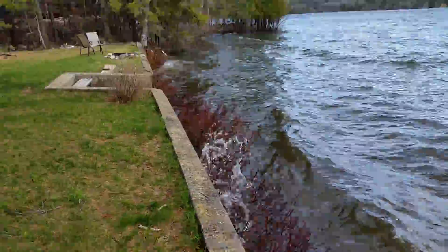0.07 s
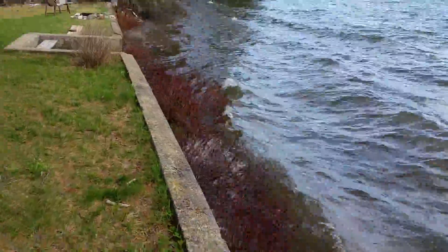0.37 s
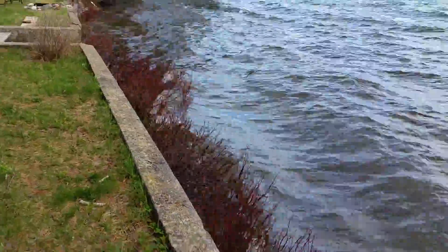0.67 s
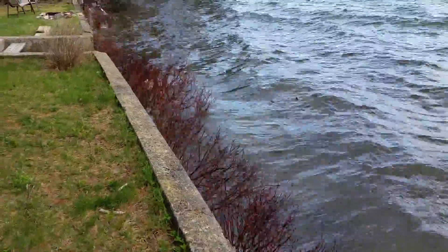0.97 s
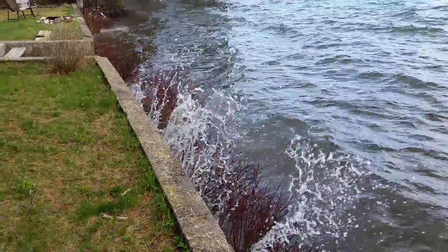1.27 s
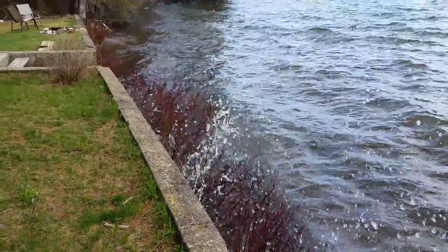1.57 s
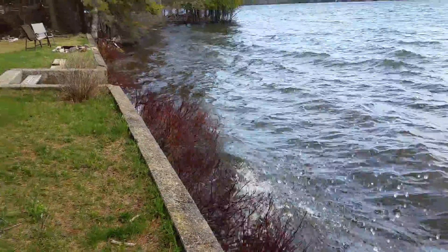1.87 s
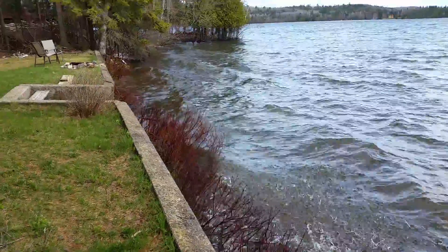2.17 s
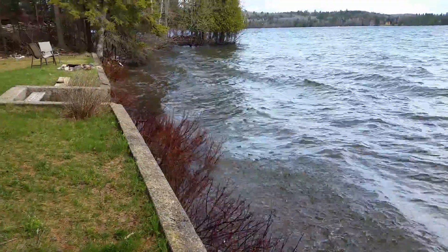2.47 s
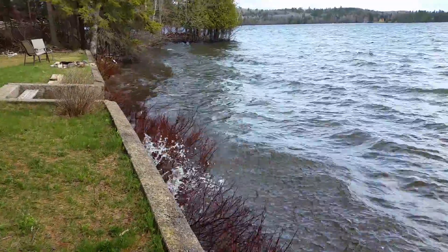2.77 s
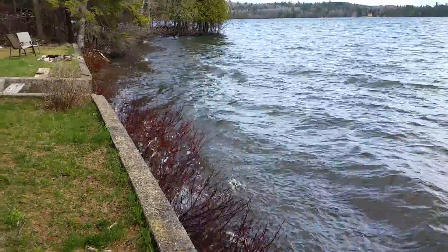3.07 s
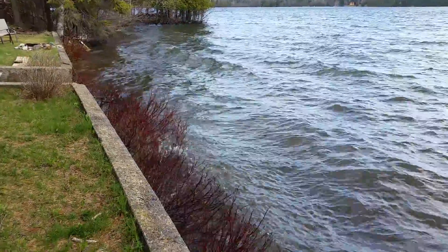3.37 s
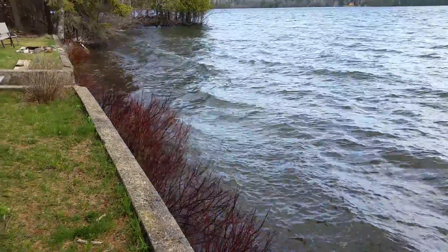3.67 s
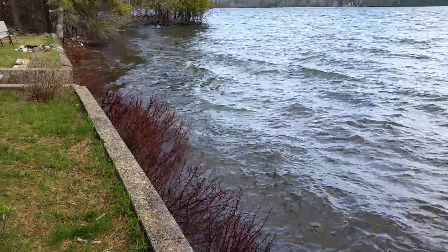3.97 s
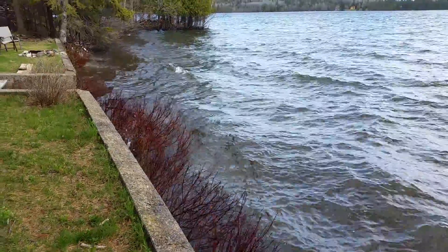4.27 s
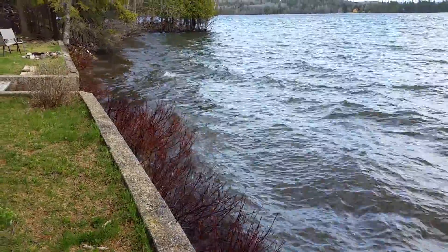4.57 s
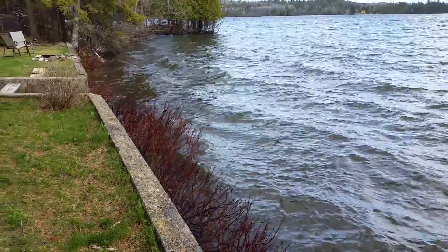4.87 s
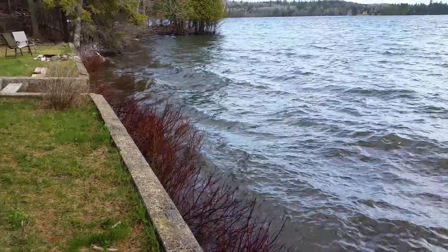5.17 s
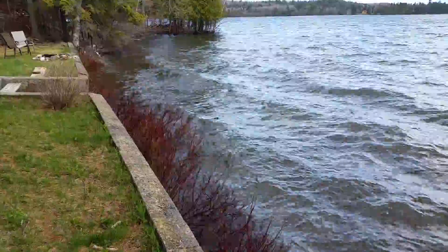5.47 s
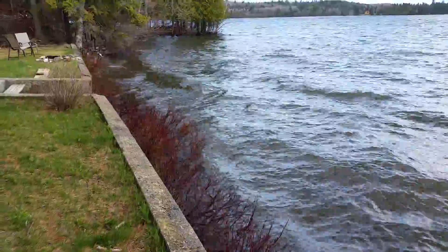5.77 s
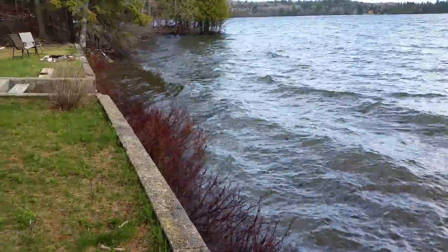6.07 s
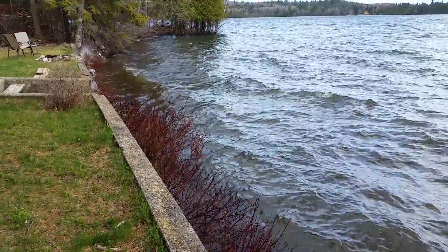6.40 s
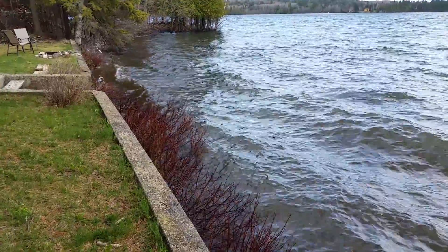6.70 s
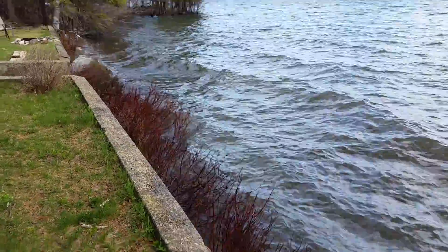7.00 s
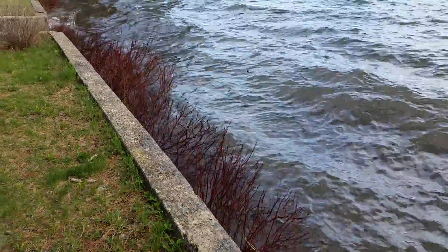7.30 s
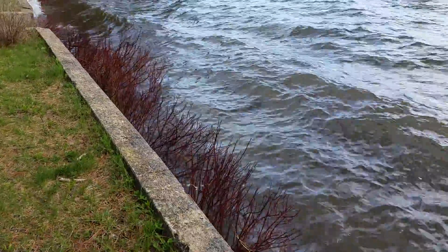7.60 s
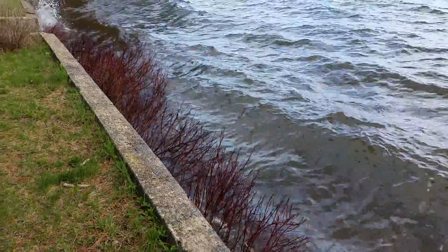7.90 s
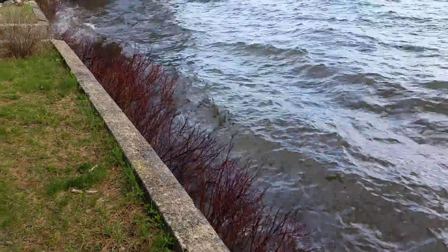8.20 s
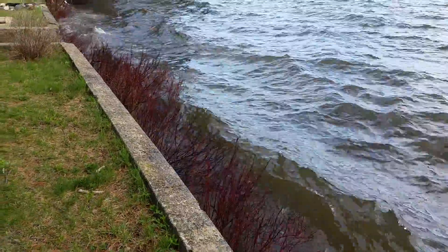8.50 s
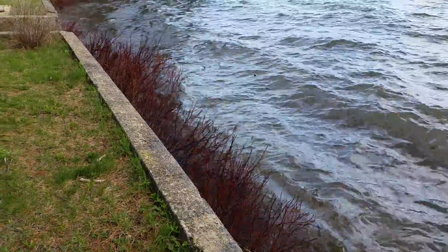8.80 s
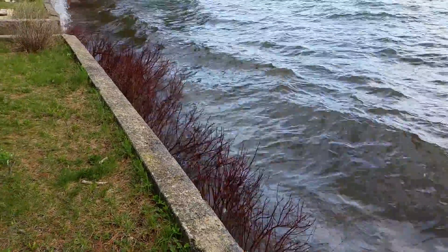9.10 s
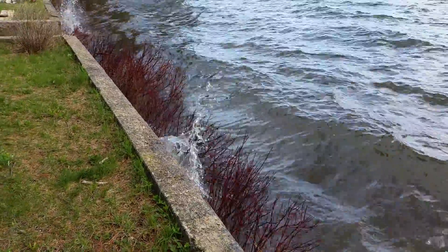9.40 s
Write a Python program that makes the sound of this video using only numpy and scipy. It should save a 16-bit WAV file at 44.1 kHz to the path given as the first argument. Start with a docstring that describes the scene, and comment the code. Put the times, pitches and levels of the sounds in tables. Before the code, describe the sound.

Lake waves slap and splash against a low wall while gusts of wind rumble and buffet the microphone.

```python
"""On a lawn above a lake, on a windy day, waves are heard running against a low shore wall.
Near waves slap the wall and their spray patters back; later ones wash along the shore farther off.
The water sounds by bubble resonance: trapped air rings, and the smaller the pocket, the higher its pitch.
Turbulent pressure rumbles and buffets at each of two microphone ports;
the hardest gusts drive a limiter that ducks the water."""
import sys
import numpy as np
from scipy import signal
from scipy.fft import rfft, irfft, next_fast_len
from scipy.io import wavfile
from scipy.ndimage import uniform_filter1d, minimum_filter1d, map_coordinates

SR = 44100
rng = np.random.default_rng(int(sys.argv[2]) if len(sys.argv) > 2 else 0)


def transcribe(signal):
    """Save signal, clipped to [-1, 1], as a 16-bit WAV file at the path in sys.argv[1]."""
    frames = np.atleast_2d(signal).T
    limited = np.clip(frames, -1, 1)
    pcm = np.round(limited * 32767).astype(np.int16)
    wavfile.write(sys.argv[1], SR, pcm)


N = 416744
TIME = np.arange(N) / SR


def waves():
    """Superposition of bubbles: near waves patter in coarse drops, far ones blur into a wash."""
    # spectra of near and far water: (frequency [Hz], left density [dB], right density [dB])
    near_spectrum = [(150, -49, -21), (505, -5, -7.5), (1030, -2, -8), (1940, 2, -10), (2530, -2.5, -16),
                     (3500, -5, -16), (4300, -12.5, -21.5), (5760, -8.5, -22), (7080, -2.5, -31),
                     (8400, -9, -32), (10400, -11.5, -31), (12300, -4.5, -19), (13900, -10.5, -14),
                     (15400, -9.5, -12)]
    far_spectrum = [(150, 6.5, 6.5), (597, 1.5, -2.5), (1010, 0, -6.5), (1820, -0.5, -8.5), (2460, -6, -20),
                    (3340, -8.5, -23.5), (4560, -19, -30.5), (5540, -27, -31), (6430, -16.5, -33),
                    (7250, -10, -34), (9000, -15, -40), (12500, -18.5, -29.5), (15900, -26.5, -22)]
    coarse = bubbles(per_s=7500, size_db=4.0, cycles=16.6, clump_db=4.0)
    slosh, fizz = water(near_spectrum, coarse, foam_db=1.0, lag_s=.0001, coherence=0.96,
                        churn_db=1.22, fizz_from_hz=3800)
    fizz = wander(fizz, octaves=.05, rate_hz=4)
    fine = bubbles(per_s=4000, size_db=3.0, cycles=17, clump_db=2.5)
    far = water(far_spectrum, fine, foam_db=4, lag_s=0.00024, coherence=0.57,
                churn_db=0.79, fizz_from_hz=3080)
    return sum(gain * part for gain, part in zip([*breaking(), *washing()], [slosh, fizz, *far]))


def bubbles(per_s, size_db, cycles, clump_db, clump_hz=12.7):
    """Damped resonance: random bubbles ring down 60 dB in `cycles` periods; most are small and high."""
    # large, low bubbles are much of a strength; only fine drops stand far out:
    # (pitch [Hz], greatest excess level [multiples of size_db])
    size_limit = [(2500, 2.3), (6000, 4.5)]
    out = np.zeros(N)
    pitches = np.geomspace(400, 15500, 26)
    for hz, share in zip(pitches, pitches / pitches.sum()):
        when, size, polarity = rng.random((6000, 3))[:int(per_s * share * N / SR)].T
        excess = np.minimum(-np.log(1 - size), np.interp(hz, *np.transpose(size_limit)))
        clicks = np.full(N, 1e-18)
        clicks[(when * N).astype(int)] = from_db(size_db * excess) * np.sign(polarity - .5)
        clicks *= from_db(clump_db * drift(clump_hz))   # like sizes come in clumps
        radius, angle = from_db(-60 * hz / (cycles * SR)), 2 * np.pi * hz / SR
        ringing = signal.lfilter([1, 0, -1], [1, -2 * radius * np.cos(angle), radius ** 2], clicks)
        out += np.sqrt(share) * rms_one(ringing)
    return rms_one(out)


def water(spectrum, grains, foam_db, lag_s, coherence, churn_db, fizz_from_hz):
    """Partial coherence of bubbles and foam: low slosh reaches the right port late; fizz is diffuse."""
    left = rms_one(grains + from_db(foam_db) * rng.standard_normal(N))
    diffuse = rng.standard_normal(N)
    right = coherence * np.interp(TIME - lag_s, TIME, left) + np.sqrt(1 - coherence ** 2) * diffuse
    churn = rms_one(from_db(churn_db * drift(19.0)))
    slosh = split(colour(churn * [left, right], spectrum, (1300, 3500)), fizz_from_hz)[0]
    fizz = split(colour(churn * [left, diffuse], spectrum, (6000, 15500)), fizz_from_hz)[1]
    return slosh, fizz


def breaking(attack_s=0.03, surge_db=2, surge_s=0.012, fizz_over_slosh_db=5):
    """Incoherent sources add in power: near slosh and fizz gains as waves burst and spray rains back."""
    # waves bursting on the wall: (time [s], level [dB], length [s])
    breakers = [(0, -31.5, 0.47), (1.075, -42.5, 0.57), (2.52, -41, 0.35), (9.24, -58, .2)]
    # sheets of falling spray: (middle time [s], spread [s], slosh level [dB], fizz level [dB])
    sheets = [(.56, 0.047, -33, -34), (.72, 0.053, -34, -29.5), (.88, 0.091, -38.5, -38),
              (1.135, 0.014, -28.5, -32.5), (1.32, 0.042, -41.5, -39.5), (1.68, 0.1, -35.5, -33.5),
              (1.87, 0.075, -35.5, -29.5), (1.98, 0.065, -35, -26.5), (2.12, 0.11, -36, -30),
              (2.275, 0.06, -36, -29.5), (2.42, 0.054, -37.5, -34), (2.71, 0.14, -38.5, -46),
              (2.83, 0.079, -36, -35.5), (3.16, 0.051, -35.5, -33.5), (3.32, 0.064, -36.5, -32.5),
              (3.462, 0.0094, -50, -39), (3.59, 0.049, -42.5, -43.5), (4.03, 0.21, -50, -47.5),
              (9.267, 0.011, -40, -42), (9.338, 0.013, -52, -46)]
    power = 0
    for s, db, length in breakers:
        age = np.maximum(TIME - s, 0)
        rise = np.minimum(age / attack_s, 1)
        burst = np.exp(-(age / length) ** 4)
        surge = from_db(surge_db) ** 2 * np.exp(-age / surge_s)
        power = power + from_db([[db], [db + fizz_over_slosh_db]]) ** 2 * rise * (burst + surge)
    for s, spread_s, slosh_db, fizz_db in sheets:
        power = power + from_db([[slosh_db], [fizz_db]]) ** 2 * bell(s, spread_s)
    return np.sqrt(power)


def washing(steady_slosh_db=-41, steady_fizz_db=-50):
    """Power summation: far slosh and fizz gains as each wave swells out of the shore's steady wash."""
    # far waves: (crest time [s], half length [s], slosh level [dB], fizz level [dB])
    washes = [(0.795, 0.091, -35.5, -42), (3.27, 0.17, -40, -41.5), (4.908, 0.45, -44.5, -52.5),
              (6.89, 0.1, -42.5, -45.5), (7.22, 0.14, -50, -46.5), (7.515, 0.17, -41.5, -47.5),
              (8.346, 0.13, -62, -43), (8.593, 0.051, -59, -49.5), (9.346, 0.041, -44, -69)]
    power = from_db([[steady_slosh_db], [steady_fizz_db]]) ** 2
    for s, spread_s, slosh_db, fizz_db in washes:
        power = power + from_db([[slosh_db], [fizz_db]]) ** 2 * bell(s, spread_s, order=4)
    return np.sqrt(power)


def slaps(attack_s=.003, spatter_db=3.0, spatter_hz=150):
    """Air entrainment: water hits the wall and traps pockets that ring in spurts around one pitch."""
    # slaps; the high ones are spray: (time [s], level [dB], pitch [Hz], spread [octaves], length [s])
    impacts = [(1.087, -20, 1050, 0.94, 0.0081), (1.098, -27, 1700, 0.54, .016),
               (1.103, -24.5, 720, 0.65, 0.047), (1.108, -18, 1490, .55, .012),
               (1.13, -27.5, 1700, 0.36, 0.016), (1.143, -25, 1250, 0.46, 0.016),
               (1.278, -37, 6200, .35, .05), (1.416, -26, 1000, 0.5, 0.014),
               (1.92, -30.5, 2170, 0.34, 0.28), (1.973, -27, 2190, 0.33, .035),
               (2.173, -31, 790, 0.19, 0.03), (2.249, -38.5, 4600, 0.3, 0.14),
               (2.538, -28, 1550, 0.5, 0.067), (2.565, -29, 900, 0.3, 0.037),
               (2.872, -33, 1220, 0.16, 0.026), (3.134, -31, 1700, .25, .025),
               (3.317, -31.5, 2100, 0.38, .05), (3.321, -38, 3670, .1, .06), (3.604, -39, 1700, .2, .01),
               (3.92, -37, 1000, 0.23, .025), (4.064, -33, 1550, .25, .02),
               (4.102, -36.5, 5500, 1.3, 0.043), (4.155, -35, 5000, 1.3, 0.027),
               (4.926, -40.5, 2500, 0.44, 0.087), (6.236, -30, 1660, 0.71, 0.026),
               (6.86, -30.5, 1680, 0.55, 0.011), (6.861, -31, 9500, .4, .007), (7.802, -38, 7500, .7, .011),
               (8.238, -43, 9000, 0.32, .03), (8.63, -37, 8500, 0.33, .012), (9.238, -47, 7500, .3, 0.026),
               (9.257, -32, 1960, 0.26, 0.027), (9.315, -32, 1550, 0.33, 0.018),
               (9.324, -47, 5500, 0.65, .03)]
    out, t = np.zeros((2, N)), TIME[:SR // 2]
    spatter = rms_one(from_db(spatter_db * drift(spatter_hz)))
    for s, db, hz, spread, length in impacts:
        shape = (1 - np.exp(-t / attack_s)) * np.exp(-(t / length) ** 2)
        add(out, s, from_db(db) * cloud(len(t), hz, spread) * shape, pan_db=25.0)
    return out * spatter


def plops(chirp_per_s=4):
    """Minnaert resonance: one air pocket rings briefly, rising in pitch as it nears the surface."""
    # large pockets trapped as water falls back: (time [s], level [dB], pitch [Hz], decay time [s])
    pockets = [(1.42, -18, 980, .003), (2.183, -21, 790, .005), (2.2185, -9.5, 1270, .002),
               (2.2205, -12.5, 2080, .0015), (2.222, -16, 2800, .002), (2.552, -20, 1080, .004),
               (2.876, -21.5, 1170, .006), (2.942, -24, 1720, .004), (3.28, -22, 920, .006),
               (4.613, -26, 1750, .004), (9.342, -13, 1400, .0016)]
    out, t = np.zeros((2, N)), TIME[:SR // 20]
    for s, db, hz, decay_s in pockets:
        ring = np.sin(2 * np.pi * hz * t * (1 + chirp_per_s * t))
        add(out, s, from_db(db) * ring * np.exp(-t / decay_s), pan_db=20)
    return out


def drops(attack_s=.00015, ping_gain=.5, chirp_per_s=2.7):
    """Impact and resonance: a drop ticks, and its tiny bubble rings upward in pitch."""
    # the loudest drops close by: (time [s], level [dB], pitch [Hz], decay time [s])
    near_drops = [(.444, -14, 11500, 0.0023), (.681, -23, 6460, .002), (1.357, -22, 6460, .002),
                  (1.451, -26, 8000, .0015), (1.585, -16, 13000, 0.0016), (1.654, -20, 8000, .0015),
                  (2.386, -18, 10500, .002), (2.68, -18, 13800, .0015), (2.8, -19.5, 7950, 0.0034),
                  (2.86, -22.5, 7000, .002), (3.014, -30, 5400, .002), (3.322, -17.5, 7200, 0.0019),
                  (3.728, -28, 7800, .002), (3.751, -29, 7240, .0015), (3.8411, -27, 7460, 0.00064),
                  (3.89, -33, 6910, .0007), (3.94, -32, 7290, .001), (3.988, -35, 9000, .001),
                  (4.09, -29, 7980, .0008), (4.121, -29, 11500, .001), (4.163, -32, 8120, .0008),
                  (4.224, -20.5, 7900, 0.00086), (4.2797, -25, 14500, .0015), (4.445, -30, 8060, 0.0011),
                  (4.4966, -28, 7670, .0005), (4.63, -29, 7900, 0.0009), (4.7, -36, 11000, .0008),
                  (5.3441, -37, 7600, .001), (5.544, -34, 7700, 0.00096), (5.942, -41, 8500, .002),
                  (6.56, -38, 7100, .002), (7.488, -32, 8500, .001), (7.733, -35, 9000, .001),
                  (8.18, -30, 8540, .001), (8.394, -27, 8500, .001), (8.563, -29, 8050, .0015),
                  (9.248, -33, 6740, 0.0036)]
    out, t = np.zeros((2, N)), TIME[:SR // 20]
    for s, db, hz, decay_s in near_drops + drips():
        tick = cloud(len(t), hz, octaves=.24)
        ping = np.sin(2 * np.pi * hz * t * (1 + chirp_per_s * t))
        shape = (1 - np.exp(-t / attack_s)) * np.exp(-t / decay_s)
        add(out, s, from_db(db) * (tick + ping_gain * ping) * shape, pan_db=26)
    return out


def drips(per_s=7, decay_s=.0007):
    """A Poisson process: faint drips fall from the shore bushes, as further rows for drops()."""
    times = np.cumsum(rng.exponential(1, 200)) / per_s
    levels_db = -44.5 + 5.5 * rng.standard_normal(200)
    pitches_hz = 8000 * 2 ** (0.26 * rng.standard_normal(200))
    return [(s, db, hz, decay_s) for s, db, hz in zip(times, levels_db, pitches_hz) if s < TIME[-1]]


def wind(flow_db, rumble_db, buffet_db, crackle_db, lump_db, burst_db, flutter_db):
    """Turbulence at one port: big eddies rumble in lumps, small ones flutter, hard gusts crackle."""
    # spectra of large, small and finest eddies: (frequency [Hz], density [dB])
    rumble_spectrum = [(12, -35), (25, -24.5), (45, -5), (90, -0.5), (140, -4), (200, -9.5), (280, -16.5),
                       (400, -31.5), (700, -66), (1500, -90)]
    buffet_spectrum = [(80, -51), (180, 4.5), (300, 1.5), (450, -6.5), (650, -15.5), (900, -25),
                       (1400, -33.5), (2500, -70), (6000, -98)]
    crackle_spectrum = [(300, -17), (800, 9), (1200, -4), (1800, -18), (2600, -14), (6000, -64)]
    low_db, high_db = flow_db
    swell = np.tanh(drift(32.3))   # the stream strikes the port and misses it in turns
    lumps = from_db(low_db) * rms_one(from_db(lump_db * swell))
    flutter = from_db(high_db) * rms_one(from_db(burst_db * swell + flutter_db * drift(136)))
    rumble = from_db(rumble_db) * colour(rng.standard_normal(N), rumble_spectrum, (30, 250))[0]
    buffet = from_db(buffet_db) * colour(rng.standard_normal(N), buffet_spectrum, (330, 800))[0]
    crackle = from_db(crackle_db) * colour(rng.standard_normal(N), crackle_spectrum, (800, 2500))[0]
    # the finest eddies grow faster than the gust itself
    return lumps * rumble + flutter * buffet + flutter ** 2 * crackle


def airflow(breeze_db, side, ordinary_db=-17.5, buffet_under_db=22.5, growth=1.84):
    """A power law: buffeting outgrows rumble in a gust. Both in dB at one port (side 1 left, -1 right)."""
    # gusts: (time [s], length [s], rumble level [dB], hardness [dB], left minus right [dB])
    gusts = [(0.612, 0.027, -18.5, 16, -3), (0.723, 0.08, -9, 0.5, -25), (0.835, 0.22, -25, 16, -19),
             (1.03, 0.083, -13.5, 8.5, -22), (1.179, 0.066, -13, -12, -4.5), (1.194, 0.378, -21.5, 10, 4.5),
             (1.825, 0.065, -16, 3, 25), (2.044, 0.36, -20, 3, 13), (2.365, 0.19, -13, 1.5, 3.5),
             (2.617, 0.41, -13.5, 1.5, 6), (3.03, 0.39, -14.5, -11, 25), (3.353, 0.14, -9, -16, 9),
             (3.631, 0.045, -6.5, -8.5, 36), (3.757, 0.058, -14, 0, -19), (3.898, 0.3, -24.5, 3, -3),
             (4.062, 0.17, -14.5, -3, 12), (4.363, 0.07, -18, 4.5, 36), (4.524, 0.062, -13, -9.5, -3.5),
             (4.64, 0.2, -17.5, -15, -19), (4.85, 0.06, -15.5, 5.5, 14), (5.01, 0.35, -21.5, 9.5, 19),
             (5.451, 0.027, -16, 4.5, 9), (5.848, 0.39, -13, -6.5, 5.5), (5.96, 0.19, -9.5, -7.5, -23),
             (6.224, 0.28, -8.5, 0, -16), (6.301, 0.04, -13.5, 11.5, -25), (6.473, 0.059, -6, 0.5, -10),
             (6.594, 0.066, -13, 2, -11), (6.92, 0.11, -18.5, -3, 18), (7.193, 0.046, -14, -8, -12),
             (7.313, 0.052, -11, 5, 4.5), (7.413, 0.17, -10, 1.5, 12), (7.596, 0.16, -7, -1.5, 12),
             (7.825, 0.094, -3.5, -10, -3.5), (7.932, 0.19, -9, -2.5, 3.5), (8.182, 0.023, -12.5, -5, -3),
             (8.289, 0.038, -15, 2, -6.5), (8.661, 0.25, -11.5, 5, -27), (8.945, 0.25, -7, 2, -34),
             (9.219, 0.084, -14.5, 13, -25)]
    attack_s, release_s = 0.017, 0.052
    rumble = from_db(breeze_db - ordinary_db) ** 2   # power relative to an ordinary gust
    buffet = rumble ** growth
    for s, length, db, hardness_db, pan_db in gusts:
        rise = np.clip((TIME - s) / attack_s + .5, 0, 1)
        fall = np.exp(-np.clip((TIME - s - length) / release_s, 0, 20))
        power = (from_db(db - ordinary_db + min(side * pan_db, 0)) * rise * fall) ** 2
        rumble = rumble + power
        buffet = buffet + from_db(hardness_db) ** 2 * power ** growth
    return ordinary_db + 10 * np.log10(rumble), ordinary_db - buffet_under_db + 10 * np.log10(buffet)


def eddies():
    """Pressure pulses: a push, then a longer, weaker suction; narrow ones knock, wide ones thud."""
    # single eddies bursting on a port: (time [s], level [dB], width [s], left minus right [dB])
    bursts = [(0.767, 3, 0.00052, -30), (0.773, -5, 0.0012, -25), (0.806, -8, 0.00088, 4),
              (1.054, -8, 0.0004, -32), (1.207, -8, 0.00061, 16), (2.427, -5, 0.0012, 2),
              (2.54, -8.5, 0.00031, 10), (2.632, -2.5, 0.0011, 17), (3.497, 0, 0.00068, 20),
              (3.647, -3, 0.00036, 29), (4.396, -8, 0.00071, 20), (5.138, -6, 0.00093, 24),
              (5.213, -2, 0.0006, 26), (5.221, 7, 0.001, 36), (5.464, 1, 0.0011, 25),
              (6.313, -6.5, 0.0003, -25), (6.337, -8, 0.00039, -20), (6.361, -9, 0.0013, 0),
              (6.479, -2, 0.00061, -23), (6.504, 1.5, 0.00039, -16), (6.614, 2.5, .001, 14),
              (6.648, -1.5, 0.0011, 12), (6.692, -3, 0.0013, 14), (6.766, 0.5, .001, 22),
              (6.817, -3.5, 0.00088, 18), (7.296, -5.5, 0.00098, 13), (7.324, -4, 0.00038, 19),
              (7.334, 5, 0.0016, 5), (7.407, -12, 0.00058, 14), (7.430, -5, 0.00064, 33),
              (7.506, -5, 0.00042, 23), (7.596, -2, 0.00061, 25), (7.666, 3, 0.00045, 23),
              (7.82, 7, 0.00059, 28), (7.984, 1, 0.0017, 22), (8.051, 0, 0.00094, 14),
              (8.106, -9, 0.00063, 16), (8.181, 6, 0.0009, -26), (8.265, -2, 0.0009, 16),
              (8.487, 0.5, 0.00094, 28), (8.674, 5, 0.00057, -31), (8.691, 4.5, 0.00076, -25),
              (8.78, 0, 0.00051, -26), (8.844, 2.5, 0.00037, -30), (8.964, 5.5, 0.00057, -28),
              (9.002, -18, .0005, -21), (9.16, -3.5, 0.00038, -30), (9.189, 3.5, 0.00028, -34),
              (9.2, -6, 0.00026, -30)]
    out, t = np.zeros((2, N)), TIME[:SR // 20] - .005
    for s, db, width, pan_db in bursts:
        push = np.exp(-(t / width) ** 2)
        suction = np.exp(-(t / (2 * width) - 1.3) ** 2) / 2
        add(out, s + t[0], from_db(db) * (push - suction), pan_db)
    return out


def breeze():
    """Background flow: the slowly changing level of the wind between gusts, in dB at each port."""
    # the breeze: (time [s], left level [dB], right level [dB])
    levels = [(.4, -32, -12), (.56, -18.5, -23.5), (.95, -36, -14), (1.3, -24, -27), (2.0, -24, -36),
              (3.1, -17, -33), (3.9, -26, -20), (4.4, -24.5, -41), (5.15, -18, -26), (5.7, -31.5, -32),
              (6.7, -16, -23), (7.2, -22, -25.5), (8.2, -28, -38), (8.45, -27.5, -28.5), (9.0, -21, -31),
              (9.25, -33, -14.5), (9.45, -30, -21.5)]
    times, *ports = np.transpose(levels)
    return [np.interp(TIME, times, db) for db in ports]


def limiter(x, threshold_db=-2.5, share=0.69, attack_s=0.015, release_db_per_s=84):
    """Compression: one gain for both sides dives ahead of each peak and creeps back, ducking the water."""
    peak_db = 20 * np.log10(np.abs(x).max(axis=0) + 1e-9)
    cut_db = share * np.maximum(peak_db - threshold_db, 0)
    recovery = release_db_per_s * TIME
    held_db = np.maximum.accumulate(cut_db + recovery) - recovery
    span = 2 * round(attack_s * SR / 2) + 1
    return x * from_db(uniform_filter1d(minimum_filter1d(-held_db, span), span))


def from_db(db):
    """Decibels to amplitude ratio."""
    return 10 ** (np.asarray(db) / 20)


def rms_one(x):
    """Normalisation to unit rms."""
    return x / np.sqrt(np.mean(x ** 2) + 1e-20)


def drift(rate_hz):
    """Random modulation: noise low-passed at rate_hz, rms 1."""
    pole = np.exp(-40 * np.pi * rate_hz / SR)   # at one step per 20 samples
    slow = signal.lfilter([1], [1, -2 * pole, pole * pole], rng.standard_normal(N // 20 + 2002))[2000:]
    return np.interp(np.arange(N) / 20, np.arange(len(slow)), rms_one(slow))


def colour(x, points, band):
    """Spectral shaping: one output per dB column; the first has unit rms gain within the band [Hz]."""
    size = next_fast_len(N + SR // 10)
    hz = np.maximum(np.fft.rfftfreq(size, 1 / SR), 1)
    knots, *columns = np.transpose(points)
    gains = from_db([np.interp(np.log(hz), np.log(knots), db) for db in columns])
    gains = gains / np.sqrt(np.mean(gains[0] ** 2 * (hz > band[0]) * (hz < band[1])))
    return irfft(rfft(x, size) * gains, size)[:, :N]


def split(x, hz):
    """Complementary filtering: the low-passed part and the remainder."""
    low = signal.sosfiltfilt(signal.butter(4, hz, fs=SR, output="sos"), x)
    return low, x - low


def cloud(size, hz, octaves):
    """Band noise: a Gaussian spread around one pitch, rms 1."""
    interval = np.log2(np.maximum(np.fft.rfftfreq(size, 1 / SR), 1) / hz)
    band = np.exp(-.5 * (interval / octaves) ** 2)
    return rms_one(irfft(rfft(rng.standard_normal(size)) * band, size))


def wander(x, octaves, rate_hz):
    """Frequency modulation: the colour of a noise slides slowly up and down."""
    at = np.cumsum(2 ** (octaves * drift(rate_hz)))
    return np.array([map_coordinates(side, [at], order=3, mode="mirror") for side in x])


def bell(s, spread_s, order=2):
    """A Gaussian envelope, top 1; a higher order flattens the top and steepens the flanks."""
    return np.exp(-.5 * np.abs((TIME - s) / spread_s) ** order)


def add(out, s, sound, pan_db):
    """Level panning: mix a sound in at time s, with pan_db as left minus right."""
    at = round(s * SR)
    sound = sound[:N - at]
    out[:, at:at + len(sound)] += from_db([[min(pan_db, 0)], [min(-pan_db, 0)]]) * sound


def scene():
    """Superposition: the water, and separate turbulence at each port."""
    left_db, right_db = breeze()
    left = wind(airflow(left_db, side=1), rumble_db=0.78, buffet_db=2.0, crackle_db=6.0,
                lump_db=7.5, burst_db=8.5, flutter_db=1.0)
    right = wind(airflow(right_db, side=-1), rumble_db=1.0, buffet_db=3.0, crackle_db=2,
                 lump_db=5.5, burst_db=2.5, flutter_db=4.0)
    return waves() + slaps() + plops() + drops() + np.array([left, right]) + eddies()


def record(dry):
    """Limiting and saturation: after a silence the sound fades in, its peaks rounded and its top cut."""
    start_s, fade_s, ceiling, cutoff_hz = 0.38, 0.23, 0.97, 15900
    fade_in = 1 - np.exp(-np.maximum(TIME - start_s, 0) / fade_s)
    rounded = ceiling * np.tanh(limiter(dry * fade_in) / ceiling)
    return signal.sosfilt(signal.ellip(12, .1, 80, cutoff_hz, fs=SR, output="sos"), rounded)


dry = scene()
out = record(dry)
transcribe(out)
```